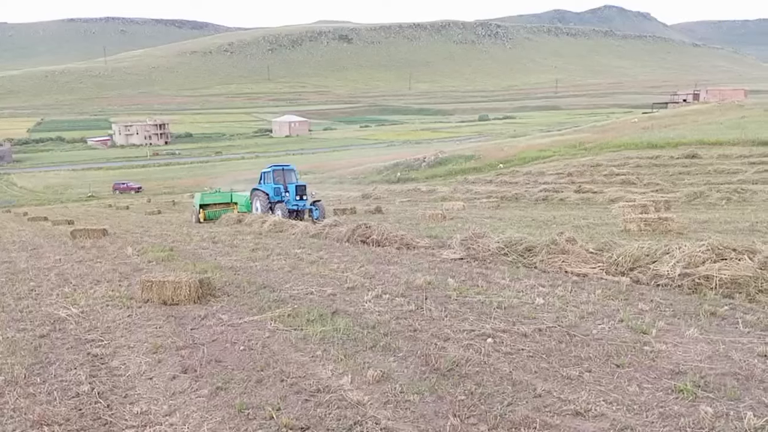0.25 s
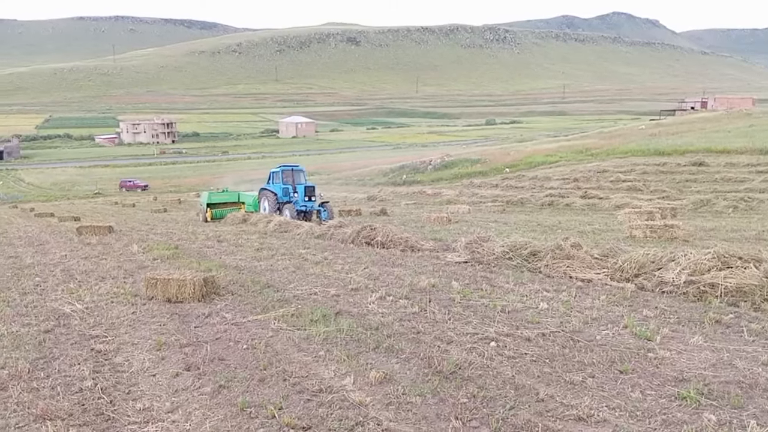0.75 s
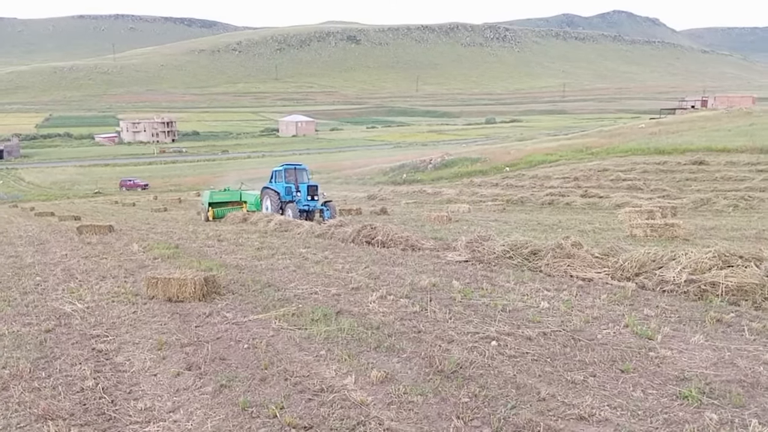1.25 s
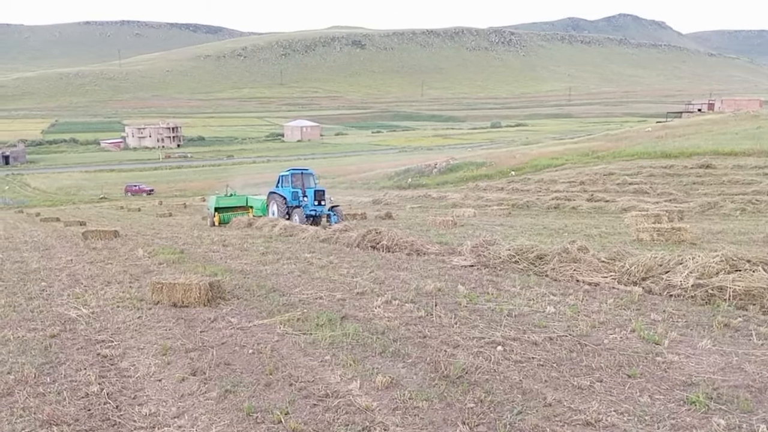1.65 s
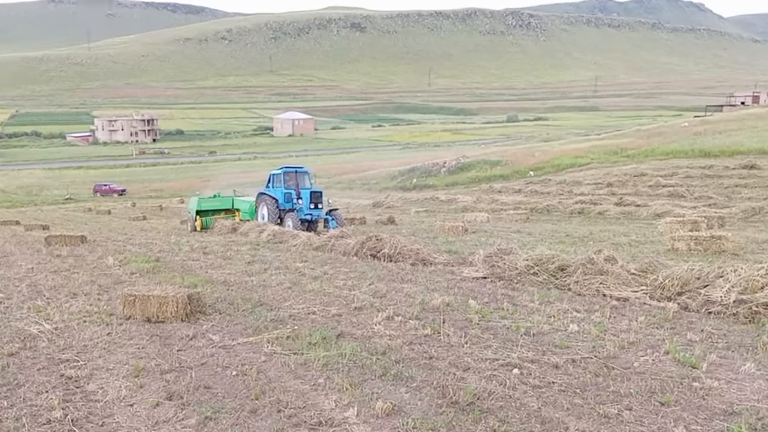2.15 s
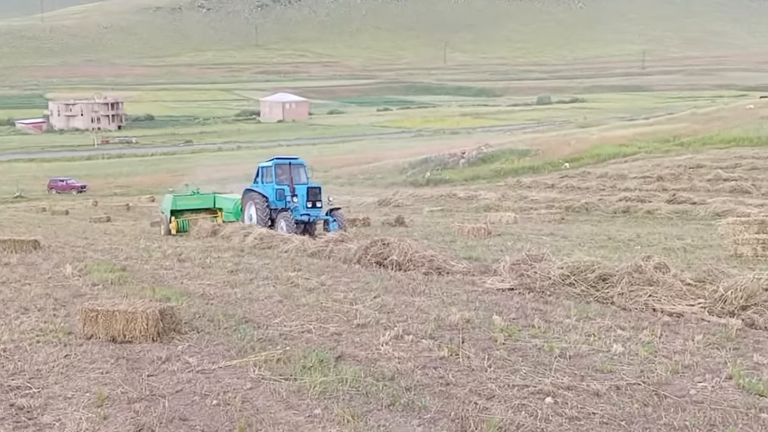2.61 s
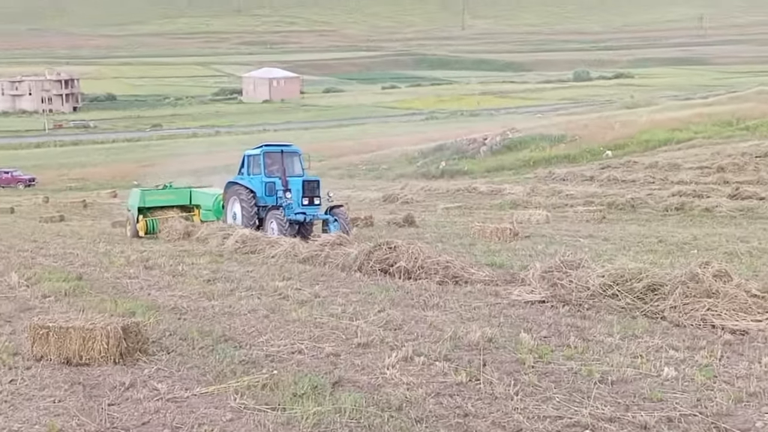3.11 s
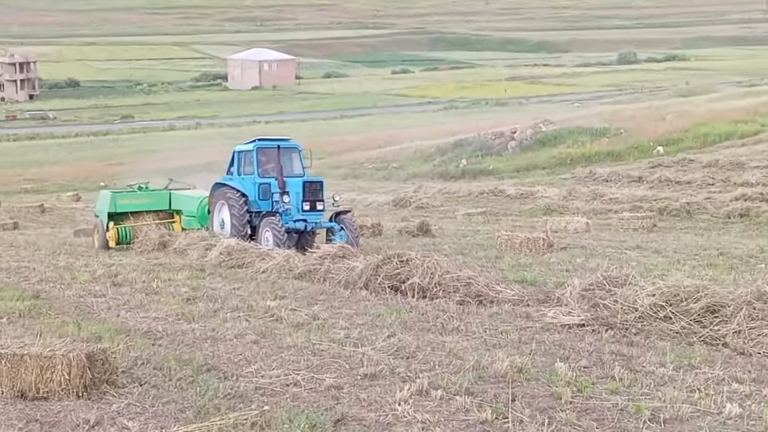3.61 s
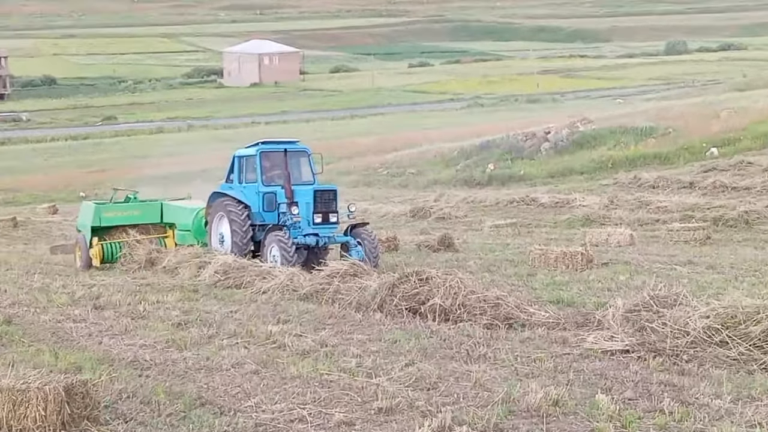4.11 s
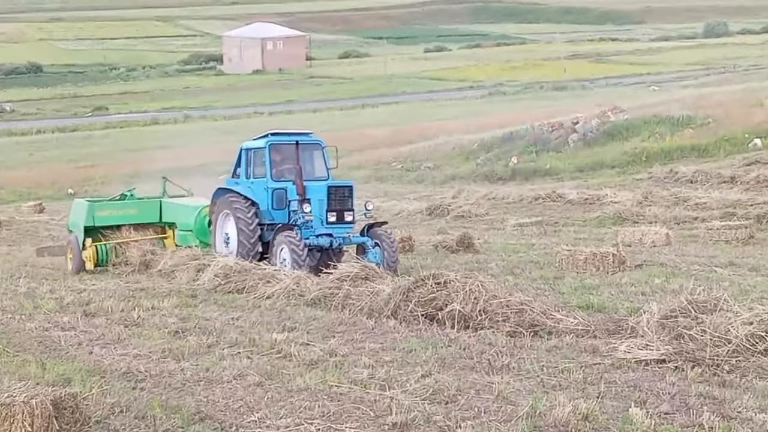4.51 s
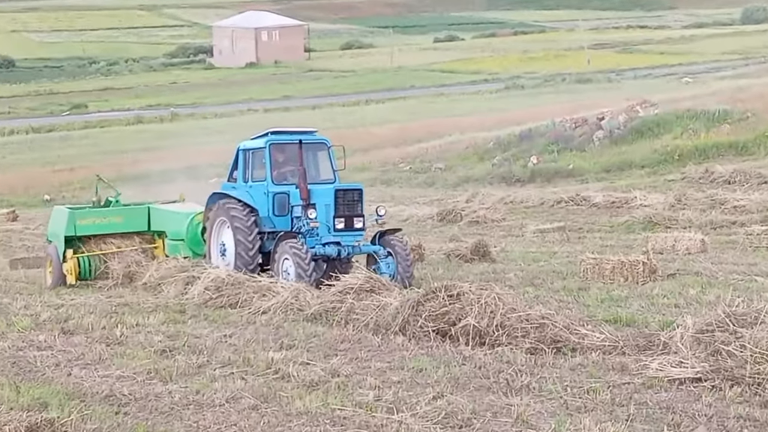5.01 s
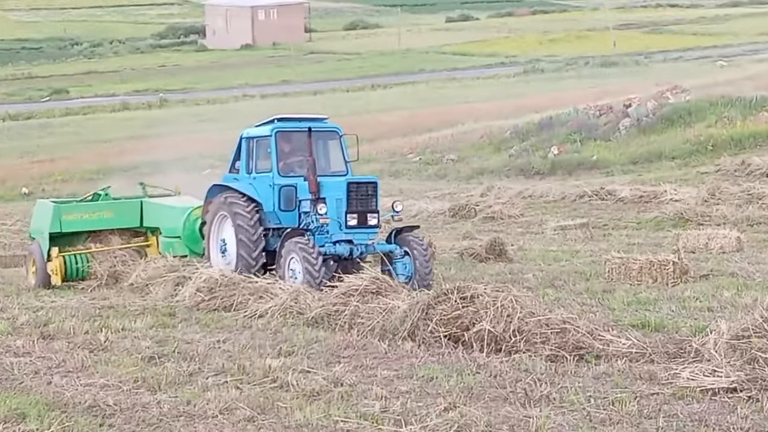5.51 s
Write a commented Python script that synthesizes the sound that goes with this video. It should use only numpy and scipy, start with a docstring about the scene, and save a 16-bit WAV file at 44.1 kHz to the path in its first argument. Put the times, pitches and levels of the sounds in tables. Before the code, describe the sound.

A tractor pulls a square hay baler across an open field, heard in mono from some way off, dry and echo-free. The sound fades in within about 0.1 s. The diesel beats roughly forty times a second, uneven between cylinders, its speed wavering slightly; low throb and hollow boom swell in short surges as the baler loads it. Block and frame clatter constantly, with fine ticking and a faint dry hiss. Loose metal hammers in step with the engine in spells, dense from 0.3 to 0.8 s, at 1.5-2 s and 2.4-3.2 s, then more scattered. A thin bearing squeak lies low around 0.2-0.8 and 1.1-1.3 s. A strong ringing clank hits at 0.8 s, the heaviest metallic crash at 2.65 s, another clank at 2.74 s, and a cluster around 5.15 s. Hay rustles faintly near 0.7, 2.3 and 2.9 s. Engine and rattling continue to the end, about 5.75 s.

```python
"""A diesel beat of some forty firings a second fades in: a four-cylinder tractor pulls a square baler
across an open hay field, some way off. Each firing pulses the low exhaust resonances and jolts block and
frame into clatter. As the baler loads the drive, the boom swells, and in spells loose metal hammers in
step with the firings: chattering noise and damped modes. One crash, clanks, ticking tines, rustling hay
and a squeaking bearing come from short envelopes over resonances and filtered noise."""
import sys
import numpy as np
from scipy import signal
from scipy.fft import rfft, irfft
from scipy.io import wavfile
from scipy.ndimage import uniform_filter1d

SR = 44100
rng = np.random.default_rng(int(sys.argv[2]) if len(sys.argv) > 2 else 0)


def store_pcm(level_fs):
    """Save levels as 16-bit WAV."""
    pcm = np.round(np.clip(level_fs, -1, 1) * 32767).astype(np.int16)
    wavfile.write(sys.argv[1], SR, np.atleast_2d(pcm).T)


N = 253575
TIME = np.arange(N) / SR


def undb(db):
    """Decibels to gain."""
    return np.exp(np.asarray(db) * (np.log(10) / 20))


def unit(x):
    """Scale to rms 1."""
    return x / np.sqrt(np.mean(x ** 2))


def curves(table):
    """The columns of a control table, drawn as lines with one value per sample."""
    s, *columns = np.transpose(table)
    return [np.interp(TIME, s, c) for c in columns]


def colour(x, points):
    """Filter by a smooth spectrum of (Hz, dB) points."""
    hz, db = np.transpose(points)
    f = np.fft.rfftfreq(len(x), 1 / SR)
    gain_db = np.interp(np.log(f + 1), np.log(hz), db)
    return irfft(rfft(x) * undb(gain_db), len(x))


def resonances(modes, size, skirt=1.024):
    """Causal frequency response of a set of damped modes; a larger skirt darkens the valleys."""
    f = np.fft.rfftfreq(size, 1 / SR)
    power = sum(undb(2 * db) / (1 + (2 * (f - hz) / width) ** 2) ** skirt for hz, width, db in modes)
    # folding the cepstrum gives minimum phase, so nothing sounds before the drive
    cepstrum = irfft(np.log(power) / 2, size)
    cepstrum[1:size // 2] *= 2
    cepstrum[size // 2 + 1:] = 0
    return np.exp(rfft(cepstrum))


def ring(x, modes):
    """Let a drive ring a set of modes."""
    response = irfft(resonances(modes, size=16384, skirt=1.695))
    return signal.fftconvolve(x, response)[:len(x)]


def steady(x, seconds):
    """Even out the slow swells of a sound, leaving its pulses."""
    k = int(seconds * SR)
    power = uniform_filter1d(uniform_filter1d(x ** 2, k), k)
    return x / np.sqrt(power + 1e-12)


def add(out, x, s):
    """Mix a short sound in at a time."""
    i = int(s * SR)
    if 0 <= i < N:
        out[i:i + len(x)] += x[:N - i]


def walk(rate):
    """Random levels that glide to a new value every 1 / rate s; spread near 1."""
    k = int(SR / rate)
    steps = np.repeat(rng.standard_normal(N // k + 2), k)
    return 1.315 * uniform_filter1d(steps, k)[rng.integers(k):][:N]


def burst(t, rise_s, fall_s):
    """Envelope that rises to time 0 and dies away."""
    return np.exp(np.maximum(np.minimum(t / rise_s, -t / fall_s), -20))


def held(start, length, attack_s, release_s):
    """An envelope that builds up to its start, holds for a length and dies away."""
    rise = (TIME - start) / attack_s
    fall = (start + length - TIME) / release_s
    return np.exp(np.clip(np.minimum(rise, fall), -20, 0))


# Engine speed, sagging and recovering. Each row: time in seconds, firings per second.
SPEED = [(0.0, 40.45), (0.5, 38.13), (1.15, 40.47), (1.5, 37.55), (2.15, 40.36), (2.55, 39.07),
         (3.6, 40.92), (3.95, 38.85), (4.4, 40.9), (4.95, 39.2), (5.5, 40.74), (5.75, 40.51)]
# Relative strength of the four cylinders in firing order, in dB.
CYLINDER_DB = [2.5, -8, -7.5, 1.5]


def firings(first_s=.0163):
    """Firing times, by summing up the engine speed, and the strength of each in dB."""
    fired = np.cumsum(curves(SPEED)[0]) / SR
    fired = fired - np.interp(first_s, TIME, fired)
    k = np.arange(int(fired[-1]) + 1)
    return np.interp(k, fired, TIME), np.array(CYLINDER_DB)[k % len(CYLINDER_DB)]


def pulses(times, db, shape, scatter_db, jitter_s):
    """One pulse of a given shape at each firing, scattered in time and strength."""
    out = np.zeros(N)
    for s, level_db, (early, strong) in zip(times, db, rng.standard_normal((len(times), 2))):
        add(out, shape * undb(level_db + scatter_db * strong), s + jitter_s * early)
    return out


# Low resonances of the exhaust and the body around it, and the thud a heavy stroke adds.
# Each row: frequency in Hz, nominal width in Hz, relative level in dB.
THROB = [(38.8, 8, -21), (79.3, 21, 5.5)]
THUD = [(101.7, 20, 0), (118.5, 27.5, 1.5)]
BOOM = [(178, 63, -17.5), (195, 31, -3.5), (215.7, 12.6, -3.5), (250.5, 22, -10), (297, 32, -17.5)]
DRONE = [(386, 104, -1), (425.2, 45, 5.5), (477, 29, 6), (516, 7.8, 5)]
# The baler loads the engine. Each row: start of the hold in seconds, its length in seconds, then the
# levels added to the cruise in dB for throb, boom and hollow drone.
SURGES = [(0.134, 0.044, -42, -37.5, -64), (0.196, 0.037, -31.5, -41.5, -47.5),
          (0.337, .16, -38.5, -45, -46.5), (0.53, 0.098, -41.5, -56, -46.5),
          (0.644, 0.028, -32, -33.5, -44), (.83, 0.034, -58, -54, -46), (1.127, .03, -55.5, -54, -46),
          (1.282, .02, -40, -40, -58), (1.328, 0.02, -30, -38.5, -44), (1.531, 0.048, -38.5, -63, -46),
          (1.625, 0.028, -50, -38.5, -72), (1.7, 0.017, -37.5, -57, -70), (1.75, .11, -64, -57, -46),
          (1.938, 0.036, -38, -52, -60), (2.452, 0.027, -38.5, -40, -56), (2.519, 0.1, -36, -27.5, -59),
          (2.675, 0.17, -41.5, -35, -55), (2.91, .16, -39, -48.5, -58), (3.11, 0.058, -44.5, -52, -49.5),
          (3.258, .025, -36, -42, -55.5), (3.507, 0.06, -52, -36.5, -47.5), (3.62, 0.11, -49, -37.5, -53.5),
          (3.744, 0.043, -48, -30.5, -63), (4.069, 0.017, -49, -40.5, -53.5), (4.29, .03, -39, -53, -56.5),
          (4.722, 0.1, -43, -32.5, -53.5), (5.151, 0.061, -40.5, -43.5, -50.5), (5.37, .02, -47, -54, -50)]
# How surges build and die away: time constants in seconds for throb, boom and drone.
SURGE_ATTACK_S = [0.029, 0.029, 0.0098]
SURGE_RELEASE_S = [0.034, 0.053, 0.017]
CRUISE_THROB_DB, CRUISE_BOOM_DB, CRUISE_DRONE_DB = -53.5, -49, -59.5  # floor under the surges


def exhaust(times, cylinder_db):
    """Firing pulses and turbulent gas sound the low resonances, which swell under load."""
    # cruise and surges add as powers
    power = undb(2 * np.array([CRUISE_THROB_DB, CRUISE_BOOM_DB, CRUISE_DRONE_DB]))[:, None]
    for start, length, *db in SURGES:
        swells = [held(start, length, *ramps) for ramps in zip(SURGE_ATTACK_S, SURGE_RELEASE_S)]
        power = power + (undb(db)[:, None] * swells) ** 2
    throb_db, boom_db, drone_db = 10 * np.log10(power)

    puff = np.exp(-TIME[:SR // 100] / 0.00066)
    beat = pulses(times, cylinder_db, puff - np.mean(puff), scatter_db=6.0, jitter_s=0.00025)

    def voice(modes, gas_db):
        """The beat and steady gas noise through one set of resonances."""
        gas = unit(ring(rng.standard_normal(N), modes))
        return unit(ring(beat, modes)) + undb(gas_db) * gas

    throb, thud = voice(THROB, gas_db=0.5), voice(THUD, gas_db=3)
    boom, drone = voice(BOOM, gas_db=1.5), voice(DRONE, gas_db=3)
    # as the boom swells the throb shifts upward into a thud
    throb = throb + thud * undb(boom_db + 43.5)
    voices = [(throb, throb_db), (boom, boom_db), (drone, drone_db)]
    return sum(steady(x, seconds=0.063) * undb(db) for x, db in voices)


# Registers of the metal: main ring, upper ring, treble and panels. Each row: from Hz, to Hz.
REGISTERS = [(2250, 2900), (2900, 4150), (4150, 14000), (560, 2250)]
# Modes of engine block and baler frame. Each row: frequency in Hz, nominal width in Hz, relative level in dB.
FRAME = [(688, 31, -16), (859, 181, -12), (949, 84.4, -3), (1088, 132, -9), (1367, 23, -1),
         (1511.4, 33, -1.5), (1742, 46, -2), (1934, 60, -3), (2224, 135, -5.5), (2409, 45, 7),
         (2496, 125, 4), (2712, 62, 4), (2815, 180, -20), (3122, 94, 0.5), (3420, 59, -4.5), (3360, 32, 0),
         (3776, 135, -4), (4199, 300, -12), (4540, 49, -24.5), (4933, 38, -6.5), (5140, 110, -8.5),
         (5270, 67, -24), (5860, 260, -20.5), (6140, 25, -13.5), (6420, 27, -16), (7180, 210, -28),
         (8000, 180, -57)]
# Running clatter. Each row: time in seconds, then levels in dB for the block, the frame's ring, the treble.
CLATTER = [(.13, -50, -49, -68), (.45, -40, -38, -67), (.9, -45.5, -47.5, -59.5), (1.5, -45.5, -46, -57),
           (2.15, -44.5, -43.5, -66), (2.7, -43, -39.5, -53), (3.25, -44, -42, -61),
           (3.55, -41, -39, -55.5), (4.2, -43.5, -43, -60.5), (5.75, -44.5, -42.5, -57.5)]
# Spectrum of the hay and air hiss. Each row: frequency in Hz, filter gain in dB.
HISS = [(600, -16), (4000, 12), (7500, 5), (10000, -1.5), (11500, -4), (13500, -11), (15300, -3)]


def clatter(times, cylinder_db):
    """Diesel knock and running chains ring block and frame, each mode flaring on its own; hay hisses along."""
    *level_db, treble_db = curves(CLATTER)
    t = np.arange(SR // 20) / SR - .005
    jolt = burst(t, rise_s=.002, fall_s=.005)
    shake = unit(pulses(times - .005, cylinder_db, jolt, scatter_db=2.5, jitter_s=0.00096))
    chains = undb(2 * walk(150))
    drive = unit((shake + undb(5.5) * chains) * rng.standard_normal(N))

    voices = np.zeros((3, N))  # block, ring, treble
    for hz, width, db in FRAME:
        flare_db = 5.5 * np.tanh(walk(38))
        # a resonance taken twice keeps the valleys between the modes dark
        b, a = signal.iirpeak(hz, hz / (1.796 * width), fs=SR)
        mode = signal.sosfilt([np.r_[b, a]] * 2, drive) * undb(db + flare_db)
        voice = int(hz >= REGISTERS[0][0]) + int(hz >= REGISTERS[2][0])
        voices[voice] += mode

    # the hiss follows only a quarter of the treble's moves
    hay_db = -60.0 + 0.24 * (treble_db - np.median(treble_db))
    hay = unit(colour(drive, HISS)) * undb(hay_db)
    return sum(unit(voice) * undb(db) for voice, db in zip(voices, [*level_db, treble_db])) + hay


# Spells in which loose metal knocks at every firing; the two faint rows near 2.4 s are bright, hissy # crackles
# of hay that tick with the firings. Each row: start, hardest knock and end in seconds, # main ring of the
# hardest knock in dB, then upper ring, treble and panels in dB relative to the main ring.
RATTLES = [(.29, .29, 0.33, -32.5, -9, -23.5, -11), (.37, .42, .45, -33.5, -1.5, -8, -8.5),
           (.478, .478, .53, -33.5, -2, -19, -10), (.58, .58, .58, -33.5, -20, -20, -25),
           (.605, .605, 0.74, -31, -3, -17.5, -9.5), (.81, .84, .84, -39.5, 0, -7.5, -3),
           (1.14, 1.14, 1.2, -48.5, 3.5, -9, -6), (1.215, 1.24, 1.24, -42, -6, -16, 0),
           (1.495, 1.495, 1.538, -39.5, 9.5, 4.5, -5.5), (1.52, 1.52, 1.615, -32.5, 5.5, -15, -7.5),
           (1.706, 1.706, 1.706, -33, -14, -14, -13), (1.735, 1.76, 1.772, -28, 0.5, -18.5, -10.5),
           (1.915, 1.915, 1.915, -28.5, -2.5, -18, -27), (1.94, 1.94, 2.012, -29, -1, -22, -7),
           (2.36, 2.36, 2.62, -49, 5, -5.5, -7), (2.44, 2.46, 2.54, -47, 0, -4, 0),
           (2.665, 2.665, 2.73, -30.5, 3, -13.5, -1.5), (2.74, 2.74, 2.74, -31, 1.5, -32, -4.5),
           (2.765, 2.765, 2.79, -32.5, -3.5, -25, -9), (2.87, 2.945, 2.94, -29.5, -2.5, -18, -8),
           (3.05, 3.05, 3.13, -33.5, -4.5, -18, -7), (3.125, 3.125, 3.15, -30, -14, -21, -14),
           (3.175, 3.18, 3.175, -33, -4, -23, -10), (3.27, 3.27, 3.33, -40, -24, -32, -3.5),
           (3.37, 3.37, 3.4, -31.5, -24, -28, -14), (3.5, 3.5, 3.6, -37.5, -3, -22, -7),
           (3.66, 3.66, 3.66, -35, -14, -19, -6.5), (3.92, 3.92, 3.97, -31, -18, -26, -20),
           (4.25, 4.25, 4.34, -42.5, -9, -19, -3.5), (4.84, 4.84, 4.89, -34, -6, -16.5, -6.5),
           (5.12, 5.14, 5.2, -33, -5, -18, -11.5), (5.33, 5.37, 5.49, -33.5, -12, -25, -9.5),
           (5.55, 5.565, 5.76, -35.5, -7.5, -20.5, -18), (5.665, 5.665, 5.7, -41.5, -13, -8, -11)]
# Softer knocks of a build-up sound different: dB that upper ring, treble and panels change, relative to
# the main ring, for each dB that the knock is weaker.
SOFT_KNOCK_TILT = [-0.68, 0.17, 0.34]
BUILD_DB, FADE_DB = 3.5, 8  # how much weaker the first and the last knock of a spell are
CYLINDER_SHARE, COLOUR_SCATTER_DB = 0.18, 1.27  # pull of the firing's strength; spread of the registers
KNOCK_LAG_S = 0.000999  # delay from firing to knock, in seconds


def blows(times, cylinder_db):
    """One knock per firing in each spell, building to the hardest and fading: (s, dB, relative dB)."""
    for start, hardest, end, db, *relative_db in RATTLES:
        first, peak, last = (np.argmin(np.abs(times - s)) for s in (start, hardest, end))
        for k in range(first, last + 1):
            early = BUILD_DB * max(peak - k, 0) / max(peak - first, 1)
            late = FADE_DB * max(k - peak, 0) / max(last - peak, 1)
            scatter = COLOUR_SCATTER_DB * rng.standard_normal(len(relative_db))
            tint = early * np.array(SOFT_KNOCK_TILT) + scatter
            level_db = db - early - late + CYLINDER_SHARE * cylinder_db[k]
            yield times[k] + KNOCK_LAG_S, level_db, relative_db + tint


# Modes of the knocked loose metal. Each row: frequency in Hz, nominal width in Hz, relative level in dB.
METAL = [(1045, 106, -4), (1170, 250, -35), (1270, 60, -39), (1535, 21, -15.5), (1840, 110, -9),
         (1975, 25, -2.5), (2154, 15, -11.5), (2493, 26, 6), (2584, 56, 2), (2660, 36, 9),
         (3080, 220, 12.5), (3335, 220, 11.5), (3380, 95, 7), (3726, 200, 6), (3910, 20, -5),
         (3940, 110, -4), (4363, 56, -6), (4710, 38, -16.5), (4843, 67, -3.5), (5370, 43, -7.5),
         (5720, 54, -8), (6570, 710, -18.5), (7350, 22, -22.5), (7240, 39, -31), (8060, 140, -29),
         (9740, 1400, -35.5)]


def knocks(times, cylinder_db, size=4096):
    """Metal parts chatter together for a few ms; each touch rings the modes in a new random balance."""
    lead_s, span_s = .012, .02  # rise before the peak; time over which the levels count
    t, f = np.arange(size) / SR - lead_s, np.fft.rfftfreq(size, 1 / SR)
    hz, width, mode_db = np.transpose(METAL)
    body = resonances(METAL, size=size, skirt=1.07) / (1 + (f / 10500) ** 4)  # air dulls the top
    # each knock swells for a few ms and fades, the panels slowest
    swells = [burst(t, rise_s=.0028, fall_s=fall) for fall in [.005, .005, .0065, .009]]
    # once the parts separate, only the modes ring on
    tail = undb(-11) * burst(t, rise_s=.002, fall_s=.02)
    out = np.zeros(N)
    for s, db, relative_db in blows(times, cylinder_db):
        detune, strength, phase = rng.standard_normal((3, len(hz)))
        chatter = rfft(rng.standard_normal(size)) * body
        pitch = hz + 0.365 * width * detune
        partials = np.sin(2 * np.pi * (np.outer(pitch, t) + phase[:, None]))
        partials = partials * undb(mode_db + 5.5 * strength)[:, None]
        for (lo, hi), swell, share_db in zip(REGISTERS, swells, [0, *relative_db]):
            tone = unit(partials[(hz >= lo) & (hz < hi)].sum(axis=0))
            grit = unit(irfft(chatter * (f >= lo) * (f < hi)))
            sound = unit(swell * (tone + undb(-4.0) * grit) + tail * tone)
            sound = sound * np.sqrt(span_s * SR / size)
            add(out, sound * undb(db + share_db), s - lead_s)
    return out


def crash(s=2.649, db=-22.5, fall_s=.028):
    """The heaviest stroke sets all the loose metal chattering in a dense run of uneven contacts."""
    contacts = rng.standard_normal(N) * undb(3.7 * np.tanh(walk(400)))
    tilt = [(600, 8), (3000, -10), (6000, -0.5), (10000, 7.5), (14000, -5)]  # (Hz, dB)
    chatter = unit(colour(ring(contacts, METAL), tilt))
    return chatter * burst(TIME - s, rise_s=0.0031, fall_s=fall_s) * undb(db)


# A heavy baler part clanks. Each row: time in seconds, peak level in dB.
CLANKS = [(0.189, -33), (.42, -37), (.615, -33), (.811, -19), (.838, -27.5), (2.741, -29), (5.141, -27),
          (5.168, -25.5), (5.193, -32)]
# What that part rings with. Each row: frequency in Hz, nominal width in Hz, relative level in dB.
CLANK_MODES = [(975.4, 45, 19.5), (1020, 21, 19.5), (1154, 29, 6.5)]


def clanks():
    """Single blows on a heavy part that rings near one pitch."""
    tone = irfft(resonances(CLANK_MODES, size=8192, skirt=2.28))
    tone = tone / np.max(np.abs(tone))
    out = np.zeros(N)
    for s, db in CLANKS:
        add(out, tone * undb(db), s)
    return out


def tines(times):
    """Spring tines and small links, jolted by the firings, tick briefly on their own high pitches."""
    t = np.arange(SR // 10) / SR
    swell = burst(t - .005, rise_s=.002, fall_s=.008)
    out = np.zeros(N)
    for s, (pitch, strength) in zip(times, rng.random((len(times), 2))):
        octaves = .9 * pitch  # above 4500 Hz
        b, a = signal.iirpeak(4500 * 2 ** octaves, 30, fs=SR)
        tick = unit(signal.lfilter(b, a, rng.standard_normal(len(t))))
        add(out, swell * tick * undb(-8 + 16 * strength - 12 * octaves), s)
    # the ticks follow the treble of the clatter
    return out * undb(curves(CLATTER)[-1] + 3.5)


# The pickup lifts a clump of hay. Each row: start in seconds, length in seconds, level in dB.
RUSTLES = [(0.723, .02, -54), (2.339, 0.027, -49.5), (2.86, 0.031, -52), (2.99, .01, -59)]
# Spectrum of the dry stalks. Each row: frequency in Hz, filter gain in dB.
RUSTLE = [(2500, -22), (5000, 14), (7500, -4), (10000, 0), (13000, -20), (15300, -7.5)]


def rustles():
    """Dry stalks crackle in short swishes: noise of jumpy level, coloured and enveloped."""
    swell = sum(held(start, length, attack_s=.01, release_s=0.034) * undb(db)
                for start, length, db in RUSTLES)
    stalks = rng.standard_normal(N) * undb(5.32 * walk(270))
    return swell * unit(colour(stalks, RUSTLE))


# A dry bearing squeaks. Each row: start in seconds, length in seconds, level in dB.
SQUEAKS = [(0.214, 0.59, -57), (1.12, 0.18, -56.5)]
# What the bearing sings on. Each row: frequency in Hz, nominal width in Hz, relative level in dB.
SQUEAK = [(5850, 100, -5), (6420, 160, -1)]


def squeaks():
    """Uneven rubbing sings thinly on two high resonances."""
    swell = sum(held(start, length, attack_s=0.045, release_s=0.039) * undb(db)
                for start, length, db in SQUEAKS)
    rubbing = rng.standard_normal(N) * undb(12 * np.tanh(walk(45.1)))
    return swell * unit(ring(rubbing, SQUEAK))


def scene():
    """The whole rig in the open field: no walls, no echo."""
    times, cylinder_db = firings()
    engine = exhaust(times, cylinder_db) + clatter(times, cylinder_db)
    loose_metal = knocks(times, cylinder_db) + crash() + clanks() + tines(times)
    return (engine + loose_metal + rustles() + squeaks())[None]


def record(dry):
    """The sound fades in within an eighth of a second; the deepest bass and the top are cut."""
    fade = undb(np.interp(TIME, [.05, .065, .09, .125], [-55, -26, -10, 0]))
    thin = signal.sosfilt(signal.butter(3, 38, "high", fs=SR, output="sos"), dry * fade)
    return signal.sosfilt(signal.ellip(10, .2, 70, 15800, fs=SR, output="sos"), thin)


dry = scene()
out = record(dry)
store_pcm(out)
```